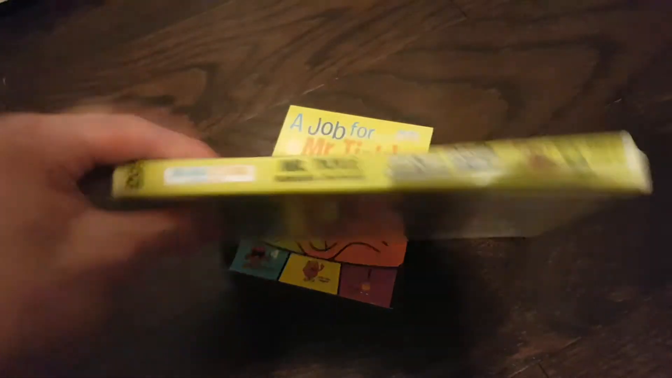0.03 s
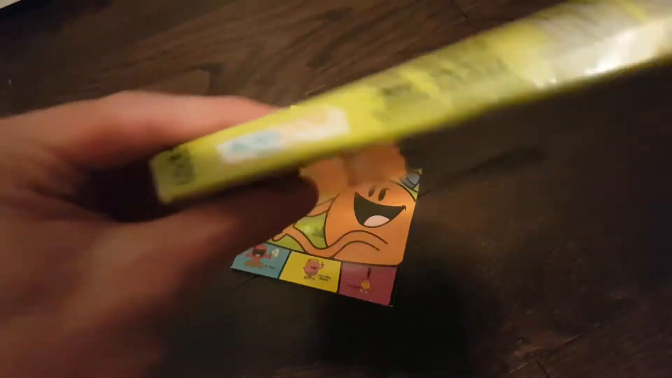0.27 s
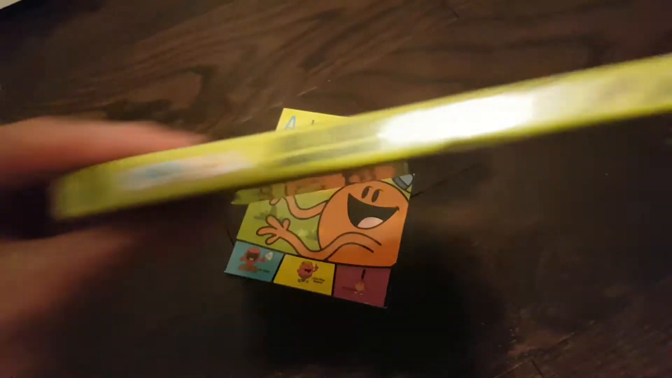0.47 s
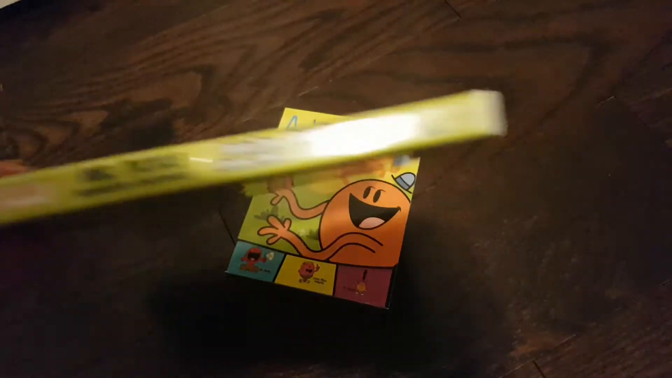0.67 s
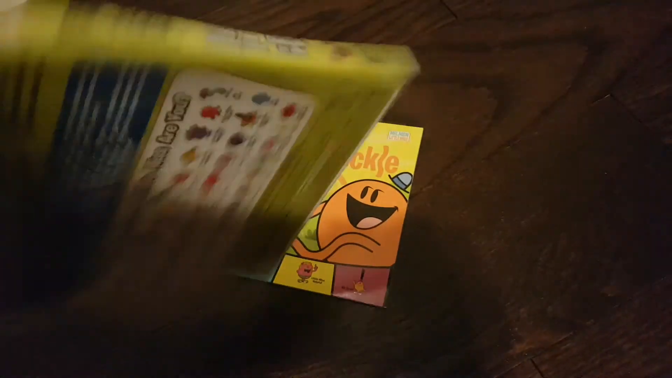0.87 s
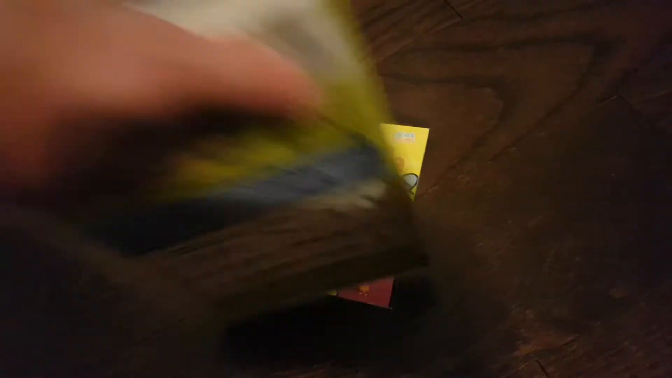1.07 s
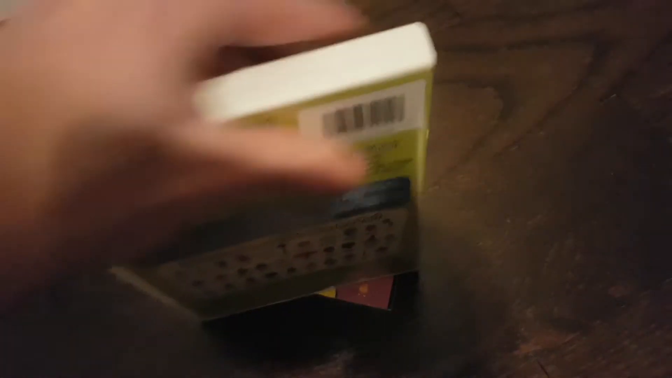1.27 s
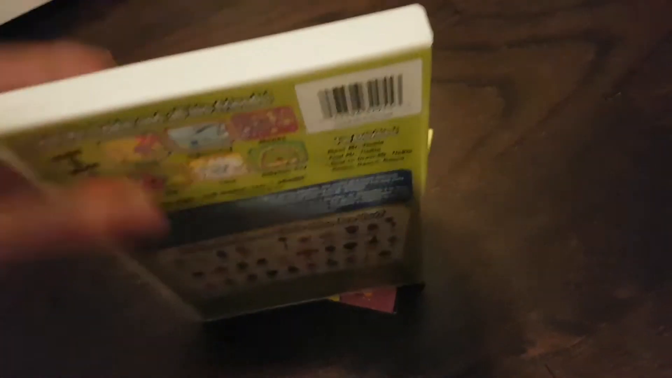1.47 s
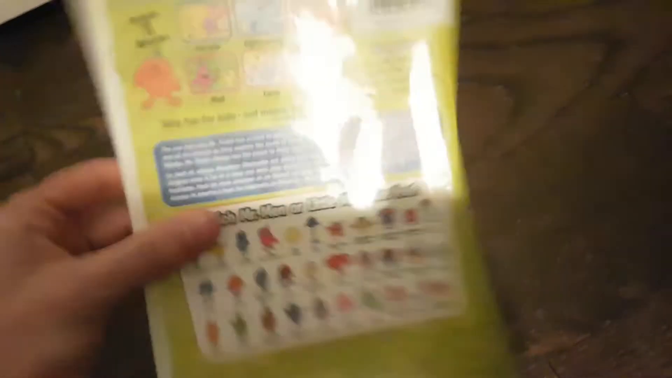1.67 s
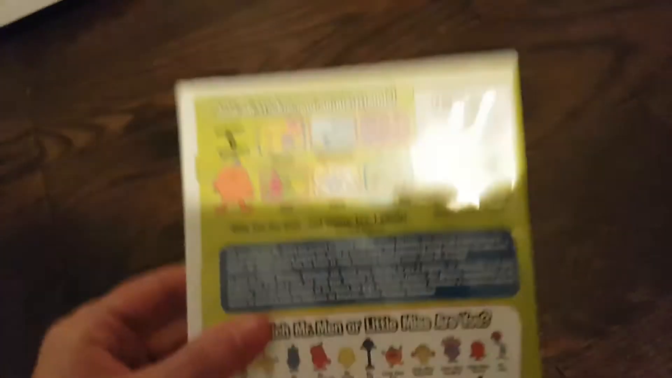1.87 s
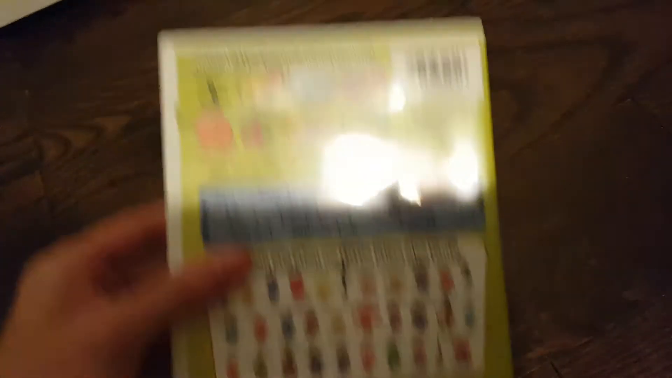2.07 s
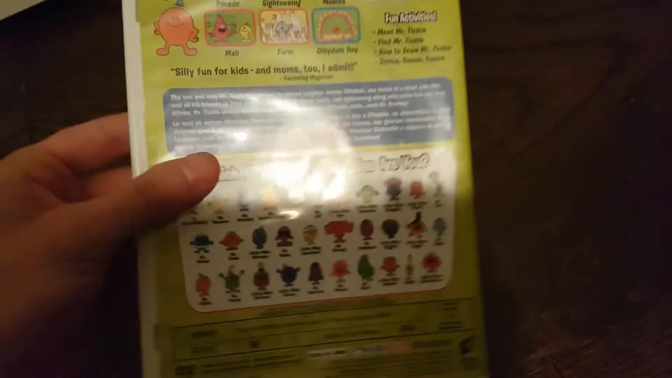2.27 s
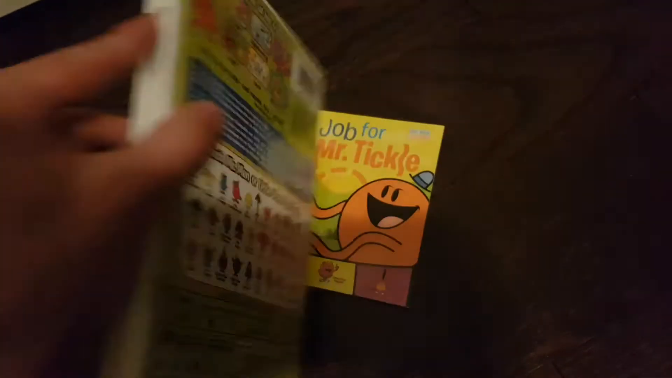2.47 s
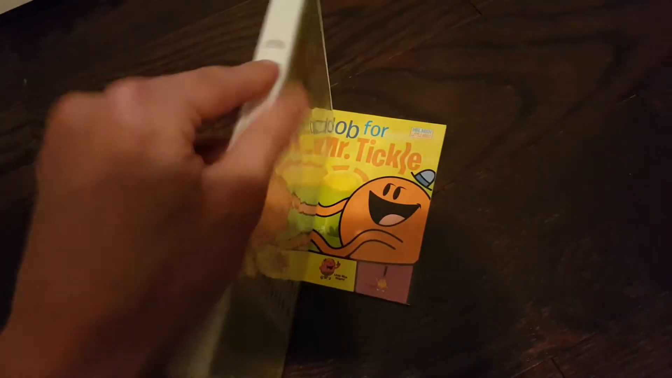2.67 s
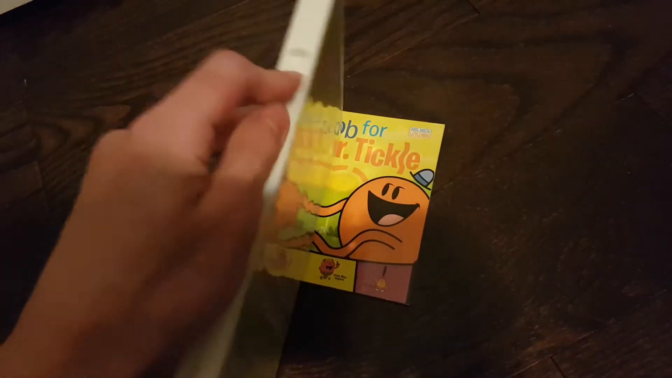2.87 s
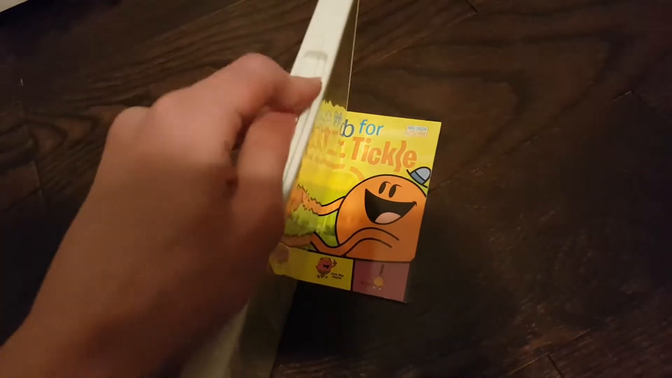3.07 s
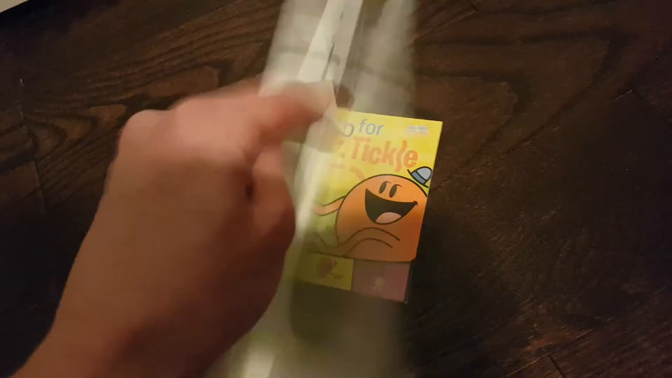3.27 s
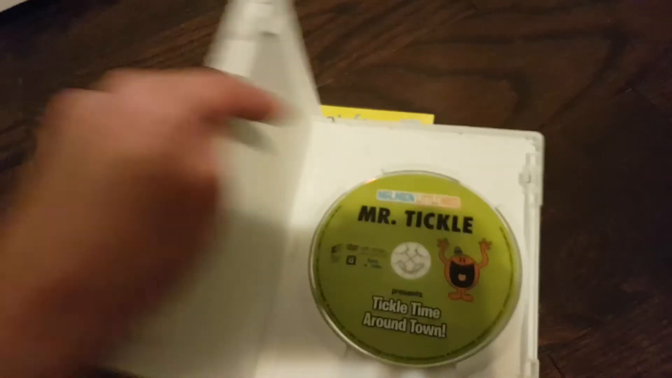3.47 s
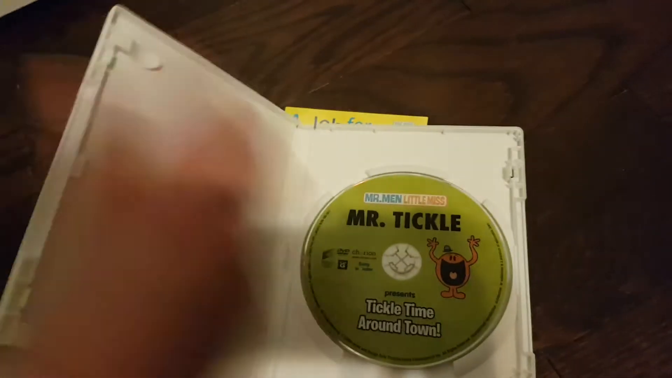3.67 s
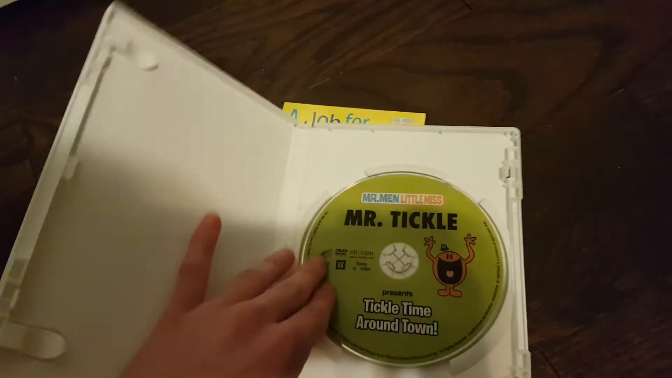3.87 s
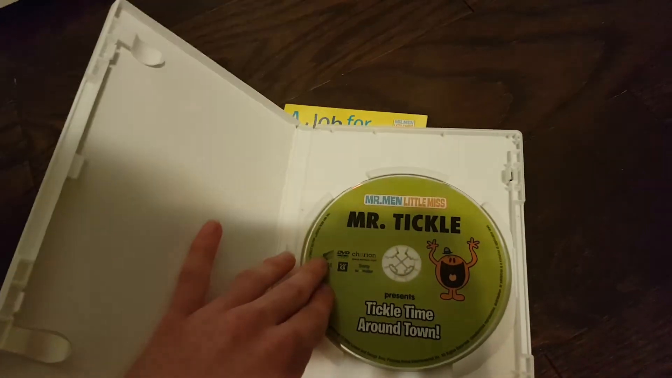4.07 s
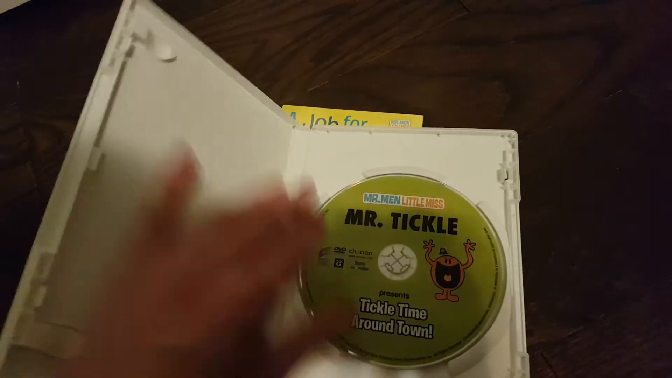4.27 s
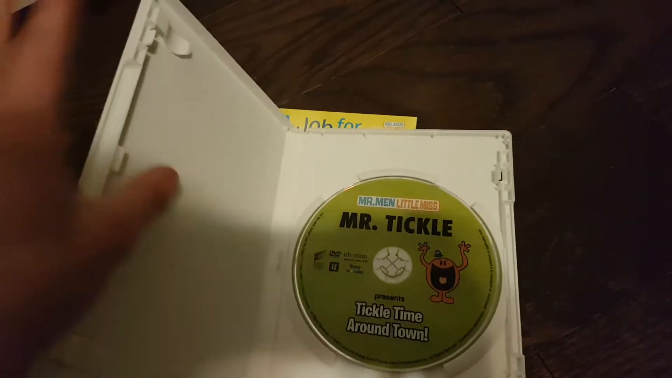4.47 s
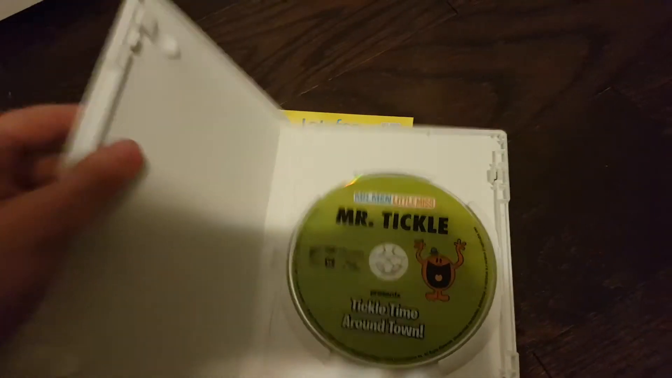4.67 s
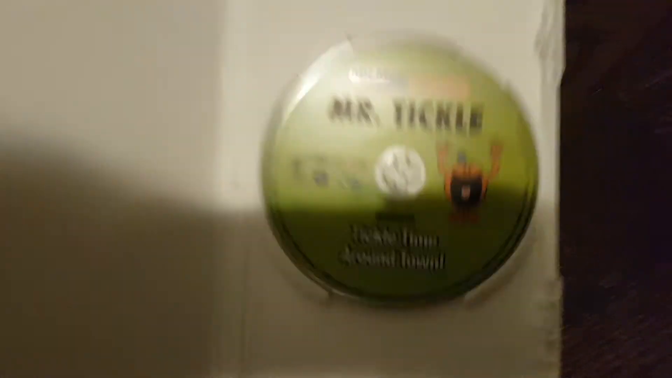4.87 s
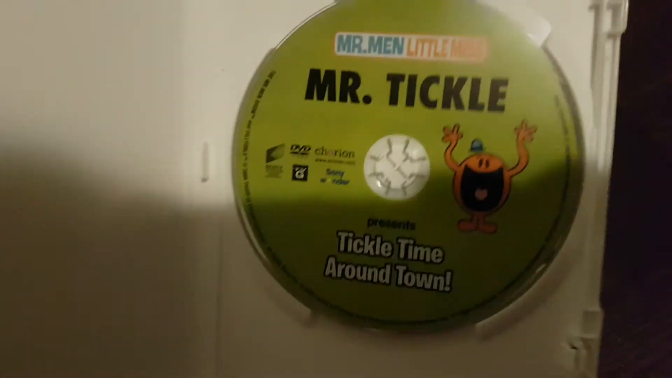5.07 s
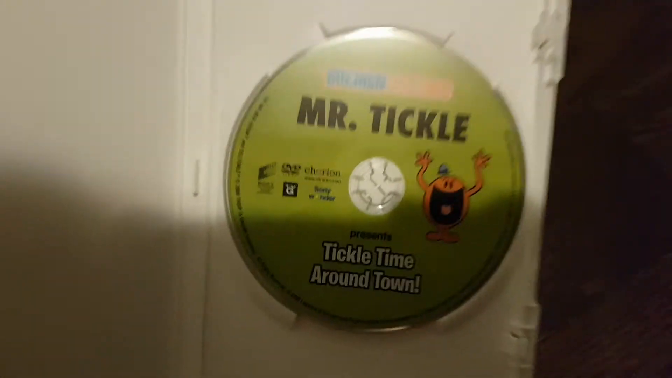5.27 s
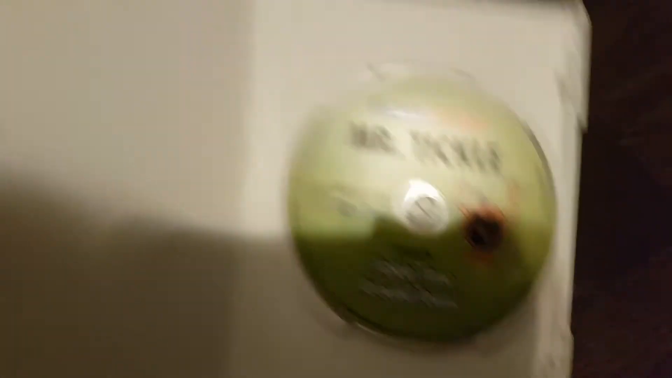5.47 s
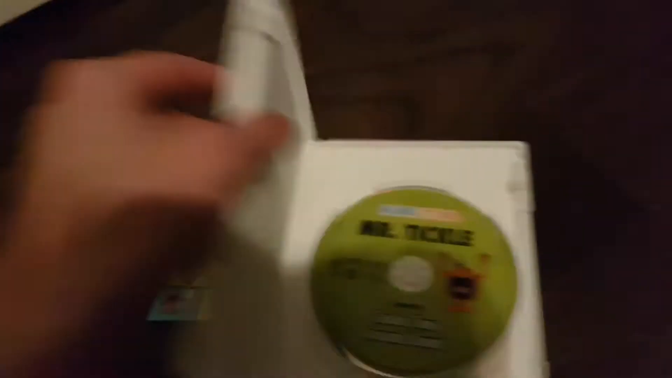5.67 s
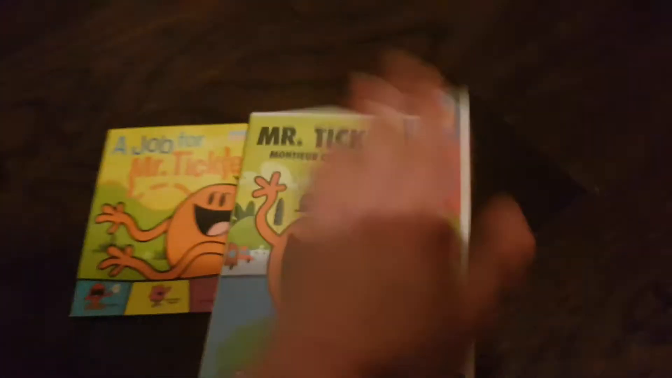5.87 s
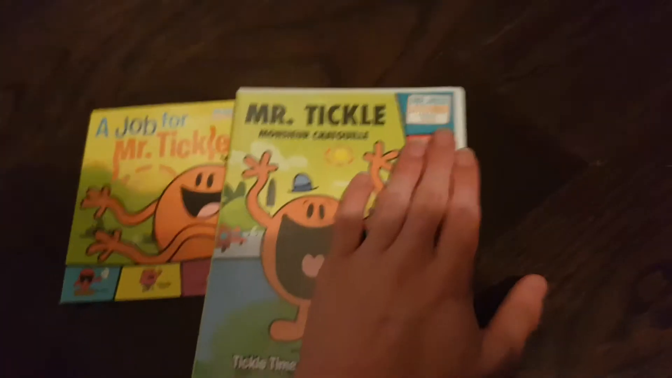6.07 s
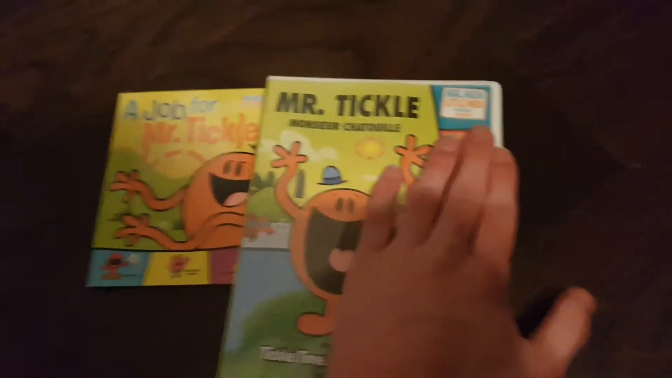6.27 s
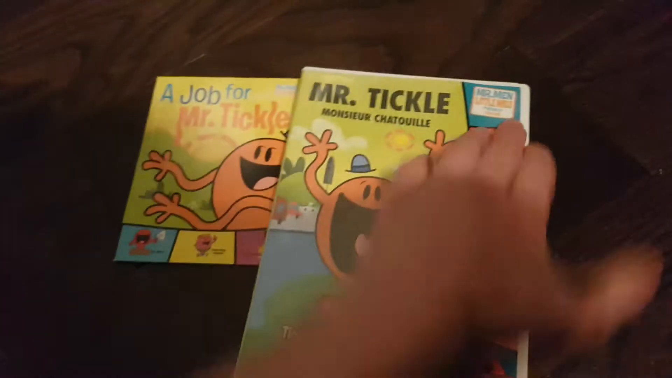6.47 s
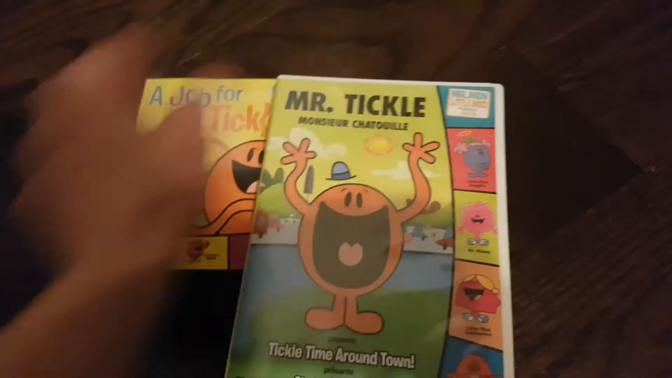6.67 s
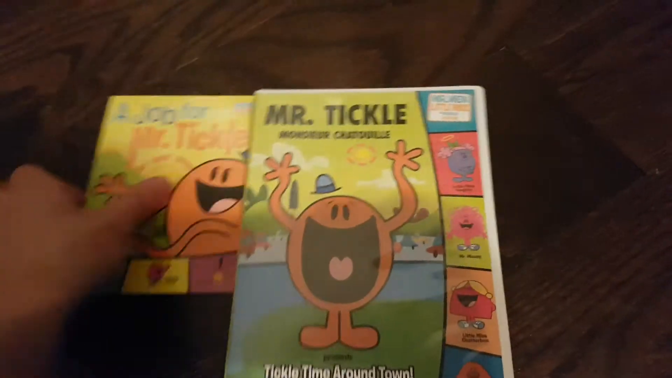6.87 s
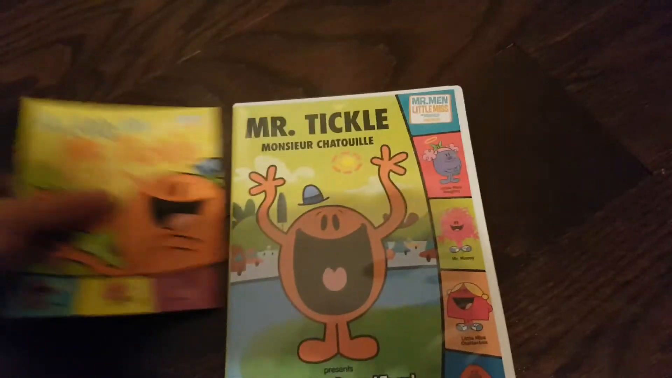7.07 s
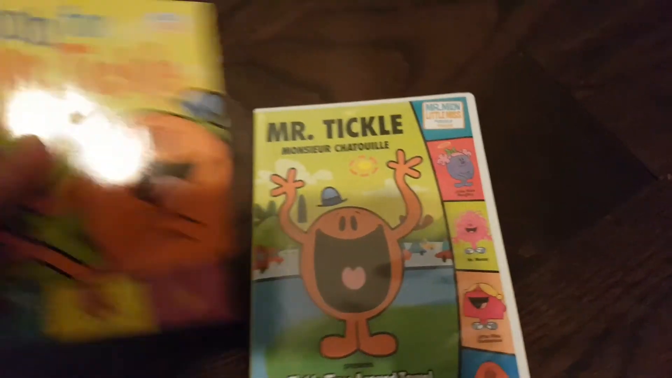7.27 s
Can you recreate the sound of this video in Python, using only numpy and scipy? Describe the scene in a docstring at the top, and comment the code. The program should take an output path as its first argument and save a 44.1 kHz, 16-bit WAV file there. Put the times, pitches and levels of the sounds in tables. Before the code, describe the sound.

A plastic disc case is handled, popped open with a crackle, then laid on a wooden floor and snapped shut.

```python
"""A plastic disc case is handled over a wooden floor in a small, quiet room.
It is stood on edge, turned, popped open with a crackling hinge, folded shut, laid down and pressed
until both catches snap. Each blow rings the hollow shell; pushes against the floor thump the boards.
Fingers rub the sleeve and squeak once on the plastic (stick-slip); at the end a booklet is slid off
the floor. Soft air noise and a faint mains hum lie underneath."""
import sys
import numpy as np
from scipy import signal
from scipy.fft import rfft, irfft, next_fast_len
from scipy.io import wavfile

SR = 44100
rng = np.random.default_rng(int(sys.argv[2]) if len(sys.argv) > 2 else 0)


def store_pcm(level_fs):
    """Save levels as 16-bit WAV."""
    pcm = np.round(np.clip(level_fs, -1, 1) * 32767).astype(np.int16)
    wavfile.write(sys.argv[1], SR, np.atleast_2d(pcm).T)


N = 322795
TIME = np.arange(N) / SR


# knocks, taps, catches: t/s, level/dB, hardness/(dB/oct), ring f/Hz, ring gain/dB
CONTACTS = [(.0527, -41.5, 0, 750, 5.5), (.0632, -45, 1.5, 2020, 4.5), (.071, -43.5, -1, 400, 2.5),
            (.78, -61.5, 5.5, 690, 10), (1.107, -25.5, -1.5, 594, 8.5), (1.235, -60.5, 4, 850, 12),
            (1.291, -56.5, -0.5, 473, 9.5), (1.567, -50, -0.5, 1500, 4), (2.558, -47, 2.5, 2700, 8),
            (2.568, -45, -3.5, 547, 6), (2.599, -43, -1, 430, 9), (2.742, -58.5, -2, 420, 7),
            (3.2802, -21.5, 0.5, 800, 3.5), (3.288, -23, 0.5, 1750, 6), (3.294, -35, 0, 1500, 7),
            (3.409, -39, 1.7, 2100, 8), (3.574, -52, 0, 1400, 4), (3.784, -55.5, 3.5, 2490, 12.5),
            (3.823, -59, 0.5, 3000, 12.5), (3.858, -61, 3.5, 3020, 1.5), (4.18, -69.5, 4, 2300, 7),
            (4.208, -64.5, 2, 2400, 9), (5.6064, -30, 2, 3000, 5), (5.649, -29, 3, 3170, 1.5),
            (5.9005, -31.5, 0.7, 850, 4.5), (5.9052, -36.5, -1.2, 745, 3), (5.971, -36, 0, 1400, 5.5),
            (6.1981, -21.5, 0.5, 1120, 12), (6.301, -16, 1, 783, 3.5), (6.551, -54, -.5, 765, 11.5),
            (6.7443, -52.5, -2.2, 1000, 2.5), (6.76, -48, -2.3, 2750, 5.5), (6.77, -48, -1, 1050, 7.5),
            (6.883, -57, 0, 800, 4.5), (7.096, -50.5, 2, 2220, 4.5)]

def case(gain_db=0.5, thump_send_db=-1):
    """Contacts, hinge ticks and floor thumps; each strikes another place, so wakes the room its own way."""
    sounds = [(s, shell_blow(register_levels(db, hardness, ring_hz, ring_db)), room_send_db(db, ring_db))
              for s, db, hardness, ring_hz, ring_db in list(CONTACTS) + hinge_ticks()]
    sounds += [(s, floor_thump(db), thump_send_db) for s, db in THUMPS]
    out, bands = np.zeros((2, N)), room_bands()
    for s, sound, send_db in sounds:
        add(out, s, sound)
        add(out, s, from_db(send_db) * signal.fftconvolve(sound, room_response(bands), axes=1))
    return from_db(gain_db) * out


# hollow shell modes: f/Hz, level/dB, t60/s
SHELL_MODES = [(404, -0.5, 0.03), (472.6, -4.5, 0.071), (710, 4, 0.0086), (753, 5, 0.024),
               (1013, -6, 0.016), (1297, 3, 0.0093), (1613, -4.5, 0.013), (2855, -10.5, 0.0018),
               (4570, -10, 0.0013)]
# register edges: f/Hz
REGISTER_EDGES_HZ = [310, 550, 1100, 2500, 6600, 16000]

def shell_blow(levels_db, chatter=0.6, chatter_per_s=3000, chatter_s=0.0027, crack_db=-1, crack_t60_s=0.027):
    """One impact and brief edge chatter ring the shell; dense high modes add a crack."""
    t = np.arange(SR // 20) / SR
    force = chatter * rng.standard_normal(len(t)) * np.exp(-t / chatter_s)
    force *= rng.random(len(t)) < chatter_per_s / SR
    force[0] = 1
    tap = ringing(SHELL_MODES, t, scatter_db=2, detune=0.04, right_lag_s=0.0001)
    shell = signal.fftconvolve(tap, force[None], axes=1)[:, :len(t)]
    crack = tinted(diffuse(len(t)), [(4500, 0), (7500, -7), (14000, -8)]) * fade(t, crack_t60_s)
    blow = shell + from_db(crack_db) * crack
    registers = zip(levels_db, REGISTER_EDGES_HZ, REGISTER_EDGES_HZ[1:])
    return sum(set_attack(bandpass(blow, low, high), db) for db, low, high in registers)


# spectrum of an ordinary blow: f/Hz, level/dB
BLOW_SPECTRUM = [(400, -5), (780, 0), (1660, -1), (4060, -5), (10300, -18.5)]

def register_levels(level_db, hardness_db_oct, ring_hz, ring_db, pivot_hz=1540, ring_width_oct=0.8):
    """dB per register: hard blows are bright; the struck spot sets one ringing pitch region."""
    hz = np.sqrt(np.multiply(REGISTER_EDGES_HZ[:-1], REGISTER_EDGES_HZ[1:]))
    tilt_db = hardness_db_oct * np.log2(hz / pivot_hz)
    spot_db = ring_db * np.exp(-(np.log2(hz / ring_hz) / ring_width_oct) ** 2)
    return level_db + at_hz(BLOW_SPECTRUM, hz) + tilt_db + spot_db


# lid opening, shutting: t/s, length/s, first gap/s, gap ratio, level/dB, fade/(dB/s)
LID_SWINGS = [(3.34, .16, .015, 1.59, -39.5, 83), (5.701, .085, .034, 1, -37.5, 219)]

def hinge_ticks(hardness_db_oct=1.5, ring_hz=3220, ring_db=6):
    """Fading ticks as CONTACTS rows; on opening they thin out as the lid slows."""
    ticks = []
    for s, length_s, gap_s, gap_ratio, db, fade_db_per_s in LID_SWINGS:
        delays_s = np.append(0, np.cumsum(gap_s * gap_ratio ** np.arange(8)))
        for t in delays_s[delays_s < length_s]:
            ticks.append((s + t, db - fade_db_per_s * t, hardness_db_oct, ring_hz, ring_db))
    return ticks


# pushes on the floor: t/s, level/dB
THUMPS = [(.066, -52), (1.107, -35.5), (1.29, -52), (1.571, -52.5), (2.599, -46), (2.743, -55.5),
          (3.289, -37.5), (3.41, -52.5), (5.901, -47), (6.302, -44.5), (6.771, -47.5)]

def floor_thump(level_db, board_hz=185, board_t60_s=0.023, rumble_db=-8, rumble_t60_s=0.14):
    """The case pushes on the boards: a short boom over a low rumble."""
    t = np.arange(SR // 10) / SR
    boom = ringing([(board_hz, 0, board_t60_s)], t, scatter_db=1, detune=0, right_lag_s=0.00034)
    rumble = rms_one(bandpass(diffuse(len(t)), 120, 260, order=2)) * fade(t, rumble_t60_s)
    return set_attack(boom + from_db(rumble_db) * rumble, level_db)


# friction spectra: f/Hz, level/dB
RASP_SPECTRUM = [(100, -14), (220, -12), (500, -4), (740, -1.5), (950, -1), (1700, -6), (2700, -10),
                 (5200, -12), (7500, -30), (16000, -47.5)]
HISS_SPECTRUM = [(4000, -3), (7000, -5.5), (12000, -2.5), (16000, -10)]

def friction(grains_per_s=500, grain_db=-4, size_spread_db=4):
    """Rasp and hiss of sliding skin or paper: smooth noise with tiny snags of uneven size."""
    sizes = from_db(size_spread_db * np.minimum(rng.exponential(1, N), 4))
    grains = (rng.random(N) < grains_per_s / SR) * sizes * diffuse(N)
    noise = diffuse(N) + from_db(grain_db) * rms_one(grains)
    return rms_one(tinted(noise, RASP_SPECTRUM)), rms_one(tinted(noise, HISS_SPECTRUM))


# finger strokes: centre t/s, half-length/s, rasp level/dB, hiss level/dB
RUBS = [(1.311, 0.085, -64.5, -68.5), (1.585, 0.036, -48.5, -70), (2.442, 0.081, -68.5, -73),
        (2.586, 0.039, -50, -73), (2.882, 0.097, -67.5, -76), (3.522, 0.02, -66, -54.5),
        (3.577, 0.027, -52.5, -55.5), (4.373, 0.03, -69, -61.5), (4.617, 0.017, -62, -69),
        (4.786, 0.039, -54, -79), (6.553, 0.0052, -73, -48.5), (6.854, 0.14, -56, -73.5)]

def finger_rubs(rasp, hiss):
    """Fingers slide on the case; friction swells and fades with each stroke."""
    out = np.zeros((2, N))
    for s, half_s, rasp_db, hiss_db in RUBS:
        on = np.abs(TIME - s) < half_s
        stroke = np.cos(np.pi / 2 * (TIME[on] - s) / half_s) ** 4
        out[:, on] += stroke * (from_db(rasp_db) * rasp[:, on] + from_db(hiss_db) * hiss[:, on])
    return out


# modes rung by the fingertip: f/Hz, level/dB, t60/s
SQUEAK_MODES = [(1095, 1.5, 0.019), (1550, -4.5, 0.0093), (2470, -4.5, 0.01), (2770, -8.5, .009),
                (4130, -17.5, 0.0067)]

def finger_squeak(start_s=4.785, length_s=0.017, slip_hz=530, jitter=0.12, level_db=-50):
    """A fingertip sticks and slips a few times on the plastic."""
    t = np.arange(SR // 25) / SR
    slips_s = np.cumsum(1 + jitter * rng.standard_normal(16)) / slip_hz
    slips_s = slips_s[slips_s < min(length_s, t[-1])]
    force, out = np.zeros((1, len(t))), np.zeros((2, N))
    force[0, (slips_s * SR).astype(int)] = np.sin(np.pi * slips_s / length_s)
    tap = ringing(SQUEAK_MODES, t, scatter_db=4, detune=0, right_lag_s=0.00005)
    squeak = signal.fftconvolve(tap, force, axes=1)[:, :len(t)]
    add(out, start_s, from_db(level_db) * rms_one(bandpass(squeak, 1080, 7500)))
    return out


# booklet speed, as rasp level: t/s, level/dB
SLIDE = [(6.96, -70.5), (7.058, -60), (7.09, -59), (7.094, -52.5), (7.118, -60), (7.146, -51.5),
         (7.26, -95.5)]

def booklet(rasp, hiss, top_hiss_db=-3.5, hiss_exponent=1.5):
    """Paper is drawn off the floor: the faster, the louder and brighter."""
    s, db = np.transpose(SLIDE)
    speed = from_db(np.interp(TIME, s, db - db.max(), left=-100, right=-100))
    return from_db(db.max()) * (speed * rasp + from_db(top_hiss_db) * speed ** hiss_exponent * hiss)


def room_send_db(level_db, ring_db, light_touch_db=-40):
    """The room's share of a blow grows with its ring and, slightly, with its level."""
    return -3 + 0.0075 * (level_db - light_touch_db) + 0.11 * ring_db


# room resonances: f/Hz, width/Hz, level/dB
ROOM_PEAKS = [(492, 40, -4), (730, 32, -10), (805, 45, -5.5), (966, 33, -5.5)]
# early echoes: t/s, level/dB
ECHOES = [(.0095, -16), (.0135, -15), (.0165, -11.5), (0.0243, -24.5)]

def room_response(bands, tail_db=-3):
    """Impulse response: early echoes, then a diffuse tail with a few resonances."""
    masks, envelopes, gains = bands
    parts = irfft(rfft(diffuse(envelopes.shape[1]))[:, None] * masks) * envelopes
    energies = (parts ** 2).sum(2).mean(0)[:, None]
    tail = (parts * gains / np.sqrt(energies)).sum(1)
    resonances = sum(from_db(db) * signal.lfilter(*signal.iirpeak(hz, hz / width_hz, fs=SR), tail)
                     for hz, width_hz, db in ROOM_PEAKS)
    response = from_db(tail_db) * (tail + resonances)
    for s, db in ECHOES:
        arrivals = int(s * SR) + rng.integers(-25, 26) + rng.integers(-6, 7, 2)   # each from its own side
        response[[0, 1], arrivals] += from_db(db)
    return response


# tail decay: f/Hz, t60/s
ROOM_T60 = [(100, 0.5), (300, 0.22), (750, 0.236), (2000, 0.3265), (5000, 0.25), (13000, 0.32)]
# tail spectrum: f/Hz, level/dB
ROOM_SPECTRUM = [(100, 1), (400, -3), (750, -3.5), (1500, -2), (3500, 2.5), (6000, -4), (9000, -0.5),
                 (15000, -5)]

def room_bands(onset_s=0.0012, build_s=0.008, size=2 ** 14):
    """Frequency mask, rise-and-decay envelope and gain for each band of the tail."""
    t, hz = np.arange(size) / SR, np.fft.rfftfreq(size, 1 / SR)
    edges_hz = np.geomspace(90, 17000, 15)[:, None]
    low, high = edges_hz[:-1], edges_hz[1:]
    centre_hz = np.sqrt(low * high)
    masks = (hz >= low) & (hz < high)
    rise = 1 - np.exp(-np.maximum(t - onset_s, 0) / build_s)
    envelopes = rise * fade(t, at_hz(ROOM_T60, centre_hz))
    gains = np.sqrt(2 * (high - low) / SR) * from_db(at_hz(ROOM_SPECTRUM, centre_hz))
    return masks, envelopes, gains


# air noise density: f/Hz, level/dB
AIR_SPECTRUM = [(20, -23.5), (35, -6.5), (60, -1), (115, -1), (195, -8), (260, -2), (790, -3.5),
                (920, -8.5), (1700, -10.5), (4400, -20), (7000, -28.5), (9500, -28.5), (15500, -22)]

def room_tone(air_db=-64, hum_hz=124, hum_db=-79):
    """Soft moving air and a faint mains hum."""
    air = from_db(air_db) * rms_one(tinted(diffuse(N), AIR_SPECTRUM))
    return air + from_db(hum_db) * rms_one(np.sin(2 * np.pi * hum_hz * TIME))


# left-right likeness of diffuse sound: f/Hz, correlation before clipping
CORRELATION = [(60, 1.1), (300, 0.7), (600, 0.7), (1100, 0.15), (2000, 0.08), (15000, 0)]

def diffuse(size):
    """White noise from all around: left and right alike in the bass, unrelated in the treble."""
    padded = next_fast_len(size)
    mid, side = rfft(rng.standard_normal((2, padded)))
    alike = np.clip(at_hz(CORRELATION, np.fft.rfftfreq(padded, 1 / SR)), -0.98, 0.98)
    spectra = np.sqrt((1 + alike) / 2) * mid + np.sqrt((1 - alike) / 2) * side * [[1], [-1]]
    return irfft(spectra, padded)[:, :size]


def ringing(modes, t, scatter_db, detune, right_lag_s):
    """Damped modes after one tap; grip and place scatter their pitch and level."""
    hz, db, t60_s = np.transpose(modes)[:, :, None]
    hz = hz * np.exp(detune * np.sqrt(hz / 1000) * rng.standard_normal(hz.shape))   # high modes move most
    envelopes = from_db(db + scatter_db * rng.standard_normal(hz.shape)) * fade(t, t60_s)
    return np.array([(envelopes * np.sin(2 * np.pi * hz * np.maximum(t - lag_s, 0))).sum(0)
                     for lag_s in (0, right_lag_s)])


def from_db(db):
    """Decibels to gain."""
    return 10 ** (np.asarray(db) / 20)


def rms_one(x):
    """Scale to unit power."""
    return x / np.sqrt(np.mean(x ** 2) + 1e-20)


def set_attack(x, db):
    """Scale so the first 8 ms have this RMS level."""
    return from_db(db) * x / np.sqrt(np.mean(x[:, :SR // 125] ** 2))


def fade(t, t60_s):
    """Exponential decay, 60 dB down at t60_s."""
    return from_db(-60 * t / t60_s)


def at_hz(points, hz):
    """Interpolate a table over log frequency."""
    table_hz, values = np.transpose(points)
    return np.interp(np.log(np.maximum(hz, 1)), np.log(table_hz), values)


def bandpass(x, low_hz, high_hz, order=3):
    """Causal Butterworth band-pass."""
    return signal.sosfilt(signal.butter(order, [low_hz, high_hz], "band", fs=SR, output="sos"), x)


def tinted(x, spectrum):
    """Zero-phase filter from (f/Hz, level/dB) points."""
    size = next_fast_len(x.shape[-1])
    gain = from_db(at_hz(spectrum, np.fft.rfftfreq(size, 1 / SR)))
    return irfft(rfft(x, size) * gain, size)[..., :x.shape[-1]]


def add(track, start_s, sound):
    """Mix a stereo sound into the track."""
    i = max(int(start_s * SR), 0)
    track[:, i:i + sound.shape[1]] += sound[:, :max(N - i, 0)]


# stereo balance: f/Hz, left minus right level/dB
BALANCE = [(200, 0.6), (1000, 0.9), (2300, 0.5), (4300, -3.5), (6000, -4.5), (8000, 8), (14000, 9.5)]

def scene(hands_send_db=-6):
    """Case and hands close by, the room around them; left and right colour the treble differently."""
    rasp, hiss = friction()
    hands = finger_rubs(rasp, hiss) + finger_squeak() + booklet(rasp, hiss)
    hands_reverb = signal.fftconvolve(hands, room_response(room_bands()), axes=1)[:, :N]
    left, right = case() + hands + from_db(hands_send_db) * hands_reverb
    left = tinted(left, [(hz, db / 2) for hz, db in BALANCE])
    right = tinted(right, [(hz, -db / 2) for hz, db in BALANCE])
    return np.array([left, right]) + room_tone()


def record(dry, cutoff_hz=15900):
    """Clip at full scale, then low-pass steeply."""
    lowpass = signal.ellip(10, 0.1, 80, cutoff_hz, fs=SR, output="sos")
    return signal.sosfilt(lowpass, np.clip(dry, -1, 1))


dry = scene()
out = record(dry)
store_pcm(out)
```